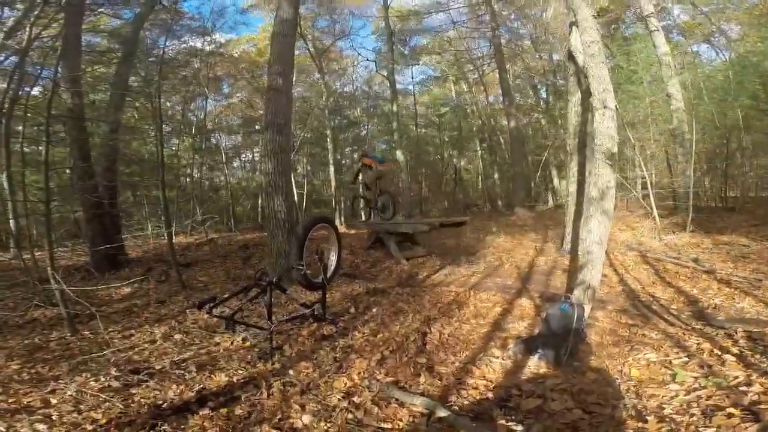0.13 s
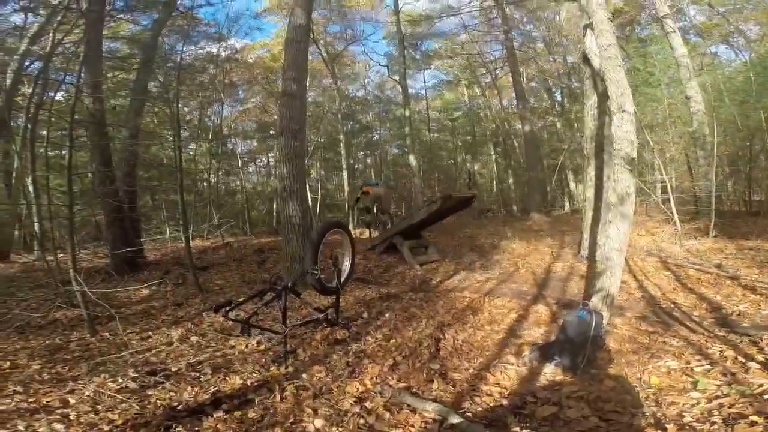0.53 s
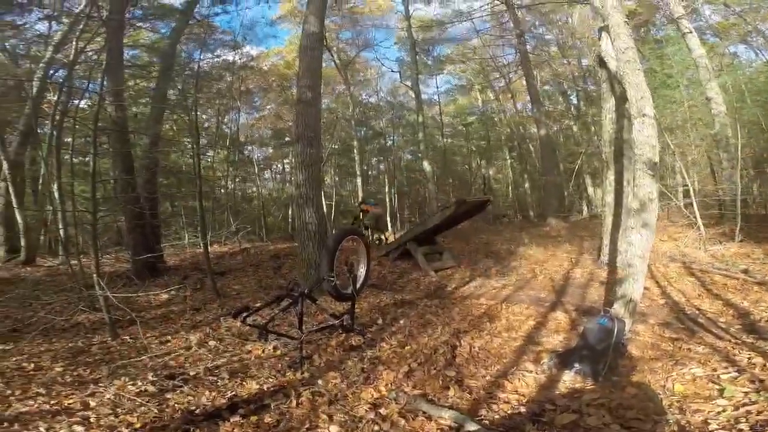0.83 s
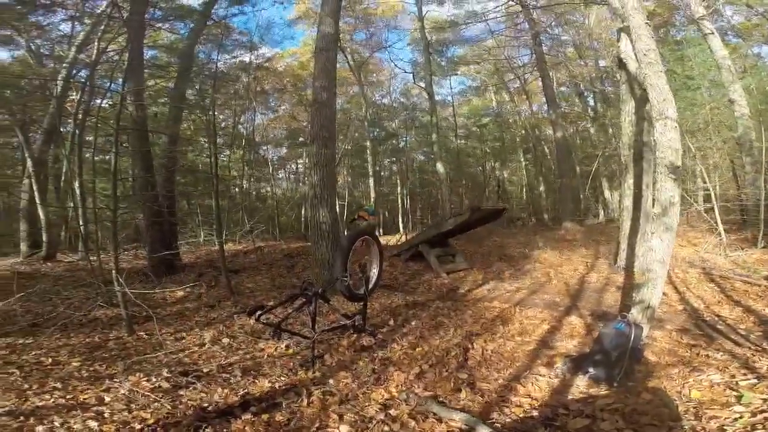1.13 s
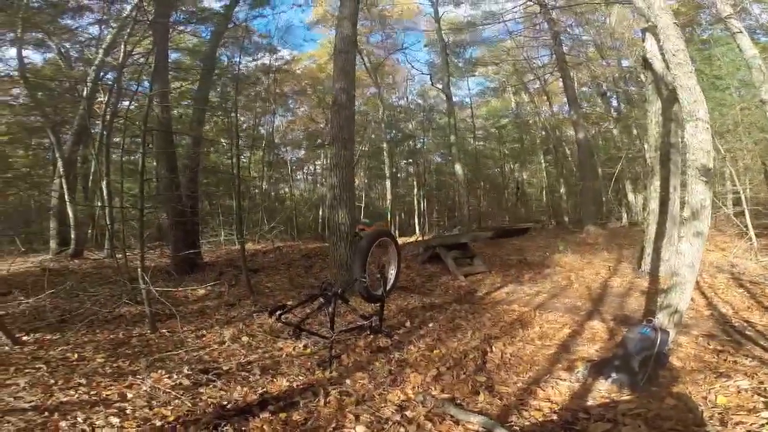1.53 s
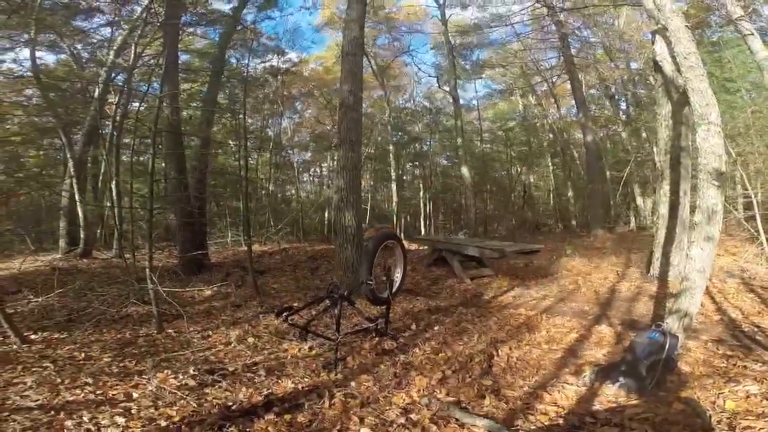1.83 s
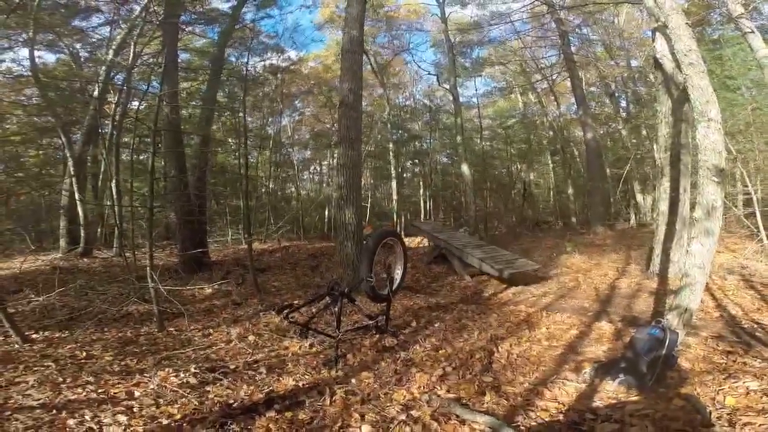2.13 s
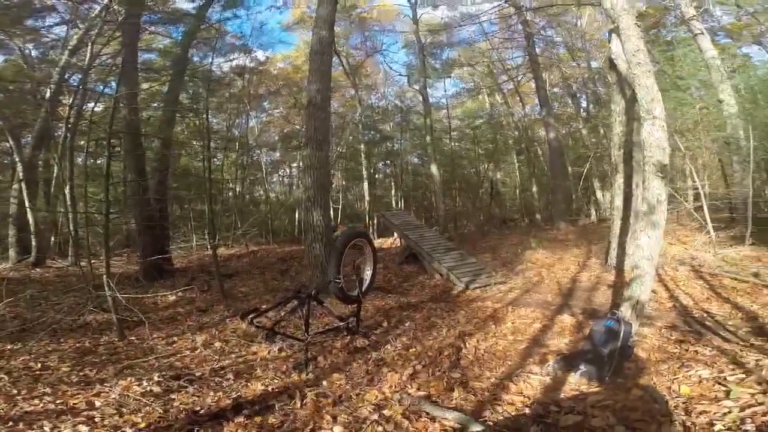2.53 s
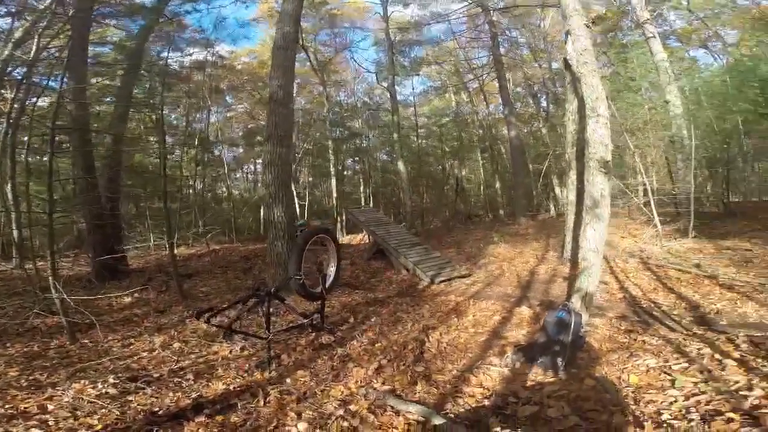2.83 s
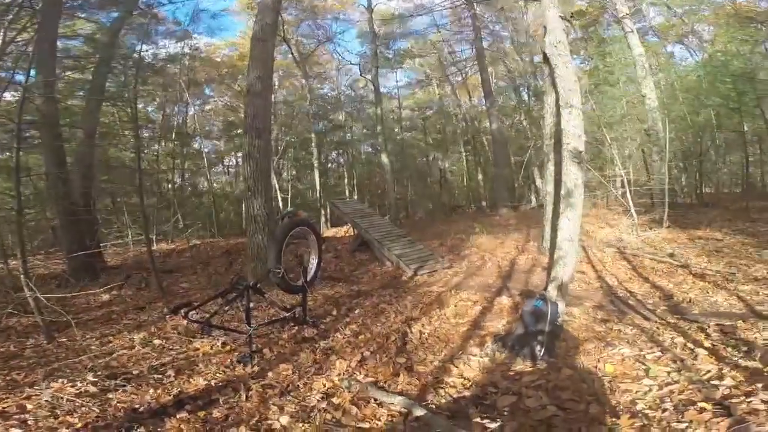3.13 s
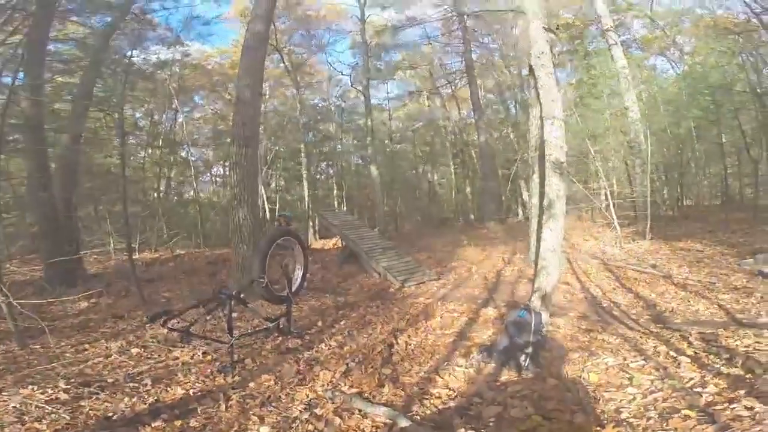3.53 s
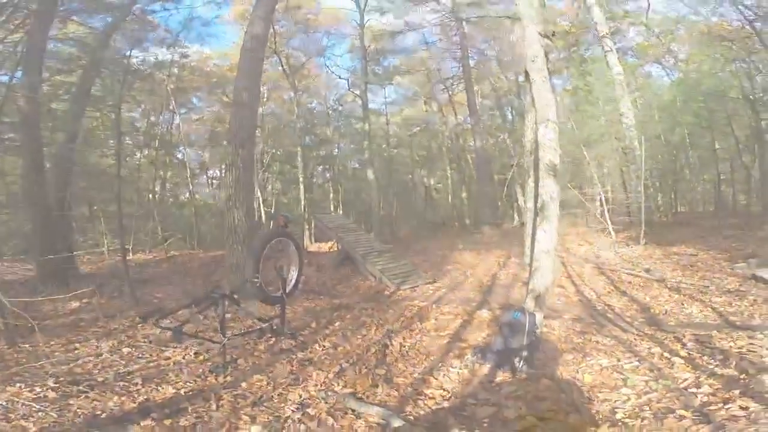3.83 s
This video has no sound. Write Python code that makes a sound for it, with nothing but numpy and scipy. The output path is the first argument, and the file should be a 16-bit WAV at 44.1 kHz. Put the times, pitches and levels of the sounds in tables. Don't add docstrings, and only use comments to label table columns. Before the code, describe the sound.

A wooden seesaw ramp clatters some metres away in a quiet, hissy forest: dry board knocks at 0.4-0.6, 0.9 and 1.2-1.3 seconds, with thin metal pings near 0.7 and 1.25 and light leaf rustle. A faint squeak at 2.2 precedes the ramp's sharp drop around 2.5, with small settling rattles. From 3 seconds, much louder close taps, scrapes and bumps hit the camera, over low wind.

```python
import sys
import numpy as np
from scipy import signal
from scipy.fft import rfft, irfft
from scipy.io import wavfile
from scipy.ndimage import uniform_filter1d

SR = 44100
rng = np.random.default_rng(int(sys.argv[2]) if len(sys.argv) > 2 else 0)


def unload_wav(signal):
    wavfile.write(
        sys.argv[1],
        SR,
        np.round(np.clip(np.atleast_2d(signal).T, -1, 1) * 32767).astype(np.int16),
    )


def volts_from_db(level):
    exponent = np.asarray(level, float) / 20
    return 10 ** exponent


N = 176400


def evened(x):
    return x / np.sqrt(np.mean(x ** 2) + 1e-20)


def add(mix, start_s, sound):
    part = mix[round(start_s * SR):][:len(sound)]
    part += sound[:len(part)]


def resonate(x, hz, width_hz):
    r = np.exp(-np.pi * width_hz / SR)
    return signal.lfilter([1 - r, 0, r - 1], [1, -2 * r * np.cos(2 * np.pi * hz / SR), r * r], x)


def resonate_twice(x, hz, width_hz):
    return resonate(resonate(x, hz, width_hz), hz, width_hz)


def body(x, peaks, tilt_db):
    total = 0
    for k, (hz, width_hz, db) in enumerate(peaks):
        gain = volts_from_db(db + tilt_db * np.log2(hz / 2500))
        total = total + (-1) ** k * gain * resonate(x, hz, width_hz)
    return total


def coloured(points):
    hz = np.fft.rfftfreq(N, 1 / SR)
    point_hz, point_db = np.transpose(points)
    shape_db = np.interp(np.log(hz + 1), np.log(point_hz + 1), point_db, left=-40, right=-90)
    return evened(irfft(rfft(rng.standard_normal(N)) * volts_from_db(shape_db), N))


def grains(count, per_s, spread_db):
    chance, side, size = rng.random((3, count))
    return evened((chance < per_s / SR) * np.sign(side - 0.5) * volts_from_db(-spread_db * np.log(size + 0.0018)))


def slow_noise(shape, size):
    noise = rng.standard_normal(shape)
    return evened(uniform_filter1d(uniform_filter1d(noise, size=size), size=size))


def rub(starts, strokes, peaks):
    out, t = np.zeros(N), np.arange(8000) / SR
    rise_s, fall_s, clump_db = 0.002, 0.005, 1.6
    for start_s, (length_s, db, fade_db, tilt_db) in zip(starts, strokes):
        attack = np.minimum(t / rise_s, 1)
        release = np.exp(np.minimum(length_s - t, 0) / fall_s)
        stroke = attack * release * volts_from_db(fade_db * np.minimum(t / length_s, 1))
        slips = grains(len(t), 9000, 1.5)
        clumps = uniform_filter1d(rng.standard_normal((len(peaks), len(t))), size=400, axis=1) * 20
        sound = np.zeros(len(t))
        for k, (hz, width_hz, peak_db) in enumerate(peaks):
            drive = resonate(slips * volts_from_db(clump_db * clumps[k]), hz, 2 * width_hz)
            sound += (-1) ** k * body(drive, [(hz, width_hz, peak_db)], tilt_db)
        add(out, start_s, volts_from_db(db) * stroke * sound / sound[:round(length_s * SR)].std())
    return out


# frequency in Hz, level in dB per Hz.
AIR_SPECTRUM = [(88,-20),(150,0.5),(300,-2.5),(1300,-7),(3500,-17),(6500,-22),(7600,-22),(11000,-25),(15100,-29.5)]
# frequency in Hz, level in dB per Hz.
RUMBLE_SPECTRUM = [(8.8, -43), (15, -4.5), (49, 1.5), (87, -5), (145, -11.5), (276, -19.5), (400, -25),
                   (520, -21.5), (880, -120)]
# time in seconds, rumble level in dB.
WIND_GUSTS = [(0, -57), (.5, -55), (1.5, -56), (2.16, -58), (2.6, -52), (3.1, -50), (3.45, -46), (3.7, -52),
              (3.8, -46.5), (4, -50)]
# frequency in Hz, level in dB per Hz.
LEAF_SPECTRUM = [(800,-15),(2000,-6),(3600,-2),(4800,-4.5),(6200,-3.5),(7200,-11.5),(10000,-45)]
# time in seconds, level in dB.
LEAF_LEVELS = [(0,-67),(.42,-64),(.65,-68),(.9,-64.5),(.92,-57),(1.0,-64),(1.3,-60.5),(1.45,-64.5),(1.9,-67.5),(4,-64)]
# frequency in Hz, level in dB.
WHINE_LINES = [(8781,-82),(11688,-89),(11719,-83),(14626,-84)]


def background():
    t = np.arange(N) / SR
    lumps = slow_noise((2, N), 1200)
    rumble = coloured(RUMBLE_SPECTRUM) * volts_from_db(np.interp(t, *np.transpose(WIND_GUSTS)) + 1.5 * lumps[0])
    leaves = coloured(LEAF_SPECTRUM) * volts_from_db(np.interp(t, *np.transpose(LEAF_LEVELS)) + 0.5 * lumps[1])
    wander = 1.2 * slow_noise(N, 6000)
    whine = sum(np.sqrt(2) * volts_from_db(db) * np.sin(2 * np.pi * hz * t + wander) for hz, db in WHINE_LINES)
    return volts_from_db(-61) * coloured(AIR_SPECTRUM) + rumble + leaves + whine


# start in seconds, size (full scale is 1), frequency in Hz, decay in seconds.
LOW_THUMPS = [(.434, -0.011, 126, 0.02), (1.3205, -0.016, 54, 0.03), (2.463, -0.006, 96, 0.024),
              (2.724, -0.01, 70, 0.024), (2.8, 0.017, 54, .01), (3.18, -0.024, 53, 0.033),
              (3.785, 0.064, 60, 0.0089), (3.801, -0.026, 67, 0.017), (3.3375, .03, 95, 0.0048),
              (3.192, -0.0031, 95, 0.016), (2.618, -0.0055, 110, 0.009), (1.317, .009, 135, .008)]


def thumps():
    out, t = np.zeros(N), np.arange(6000) / SR
    for start_s, size, hz, decay_s in LOW_THUMPS:
        add(out, start_s, size * np.sin(2 * np.pi * hz * t) * np.exp(-t / decay_s))
    return out


# start in seconds, peak level in dB, time to fall 60 dB in seconds,
# tilt in dB per octave, frequency of the struck board in Hz.
PLANK_CLATTERS = [(.436,-36,0.14,4,4430),(0.451,-34.5,0.054,1.5,3500),(.492,-33.5,0.06,3.5,2000),(0.51,-46,0.038,5,2700),(.553,-46.5,0.083,8.5,3800),(.579,-36.5,0.052,1.5,516),
                  (0.887,-38,0.081,3,2100),(.909,-51,0.054,2,5780),(1.156,-33,0.05,5,2120),(1.195,-45,0.045,4,1780),(1.263,-43,0.028,6.5,2800),(1.283,-43,0.03,5,6340),
                  (1.2905,-44,0.03,2,3750),(2.444,-49.5,0.067,-2,1900),(2.477,-33,0.054,2.5,3400),(2.479,-30.5,0.038,1,1090),(2.549,-42.5,0.19,0,1980),(2.597,-44,0.021,-2,3460),(2.663,-47,0.04,0.5,3800),(2.698,-46.5,0.06,1,2570)]
# frequency in Hz, width in Hz, level in dB.
PLANK_PEAKS = [(520,134,7.5),(1100,860,2),(1780,430,8),(2013,270,7),(2750,127,9.5),(3500,215,4.5),(3886,123,6),(4510,110,2.5),(4900,490,-2.5),(6220,480,-4.5),(8450,1070,-18)]


def plank():
    out, t = np.zeros(N), np.arange(6000) / SR
    rise_s, clicks_per_s = 0.0044, 5000
    for start_s, db, t60, tilt_db, hz in PLANK_CLATTERS:
        swell = np.minimum(t / rise_s, 1) ** 2 * volts_from_db(-60 * t / t60)
        impacts = grains(len(t), clicks_per_s, 2.1) * swell
        struck_board = resonate_twice(impacts, hz, 670)
        sound = body(impacts, PLANK_PEAKS, tilt_db) + volts_from_db(9) * struck_board
        add(out, start_s, volts_from_db(db - 8.5) * sound / sound[:600].std())
    echo_db, echo_t60 = -12, 0.8
    t = np.arange(SR // 2) / SR
    tail = rng.standard_normal(len(t)) * volts_from_db(-60 * t / echo_t60) * (t > 0.01)
    return out + volts_from_db(echo_db) * signal.fftconvolve(out, tail / np.linalg.norm(tail))[:N]


# start in seconds, peak level in dB, frequency in Hz, time to fall 60 dB in seconds.
SLAT_KNOCKS = [(.440, -40, 840, .03), (.449, -40, 2050, .04), (.452, -36, 3490, .03),
               (.4555, -34.5, 3550, .04), (.457, -40, 2500, .03), (.461, -40.5, 1230, 0.033),
               (.496, -35, 3890, 0.035), (.4975, -39, 2740, .04), (.500, -38, 990, 0.033),
               (.503, -42, 2000, .03), (.514, -47, 2650, .05), (.583, -47, 565, 0.037),
               (.584, -39, 3950, .03), (.587, -41, 1910, 0.046), (.889, -48, 3520, .03),
               (.892, -33, 1780, 0.03), (.8925, -37.5, 2160, 0.035), (.893, -39, 3530, .03),
               (.892, -45, 6470, 0.036), (.897, -40.5, 2000, 0.034), (2.448, -47.5, 1170, 0.017),
               (2.449, -53, 3600, .02), (2.482, -32.5, 1100, 0.026), (2.483, -34, 3850, .05),
               (2.484, -37, 3270, .05), (2.486, -47, 8500, .05), (2.494, -46, 646, 0.052),
               (2.497, -41, 1290, 0.034), (2.59, -47, 3480, 0.036)]


def knocks():
    out, t = np.zeros(N), np.arange(4000) / SR
    rise_s = 0.0011
    for start_s, db, hz, t60 in SLAT_KNOCKS:
        envelope = volts_from_db(db - 60 * t / t60) * np.minimum(t / rise_s, 1)
        add(out, start_s, envelope * np.sin(2 * np.pi * hz * t))
    return out


# start in seconds, frequency in Hz, level in dB, width in Hz,
# time to fall 60 dB in seconds.
TAG_PINGS = [
    (.706, 10890, -46.5, 39.7, 0.1),
    (.735, 10980, -61, 150, 0.33),
    (1.228, 12500, -62, 150, .06),
    (1.24, 13100, -69, 300, .4),
    (1.269, 13200, -47.5, 300, 0.13),
    (1.284, 13400, -62, 250, 0.12),
]


def tags():
    out, t = np.zeros(N), np.arange(12000) / SR
    rise_s = 0.0054
    for start_s, hz, db, width_hz, t60 in TAG_PINGS:
        noise = rng.standard_normal(2 * len(t))
        ring = resonate_twice(noise, hz, width_hz)[len(t):]
        envelope = volts_from_db(db - 60 * t / t60) * np.minimum(t / rise_s, 1)
        add(out, start_s, envelope * ring / ring[:800].std())
    return out


def pivot():
    out = np.zeros(N)
    start_s, length_s, hz, width_hz, db = 2.2, 0.24, 1700, 160, -65.5
    count = round(length_s * SR)
    squeak = evened(resonate_twice(rng.standard_normal(20000), hz, width_hz))
    add(out, start_s, volts_from_db(db) * np.sqrt(np.hanning(count)) * squeak[:count])
    return out


# start in seconds, length in seconds, frequency in Hz, width in Hz, level in dB.
RUB_SWELLS = [(3.275, 0.052, 1470, 530, -43.5), (3.27, 0.043, 2650, 720, -46.5),
              (3.36, 0.041, 2800, 790, -51.5), (3.355, .06, 580, 560, -48), (3.435, .045, 2950, 470, -48),
              (3.215, 0.042, 12600, 3000, -63), (3.428, 0.043, 11000, 4300, -62),
              (3.795, .045, 6500, 1200, -53), (3.80, 0.17, 2900, 420, -50.5), (3.908, .024, 1000, 220, -43),
              (3.88, 0.07, 9500, 1500, -60), (4.1, 0.17, 11700, 3000, -67), (2.48, 0.023, 10000, 3000, -59),
              (2.53, 0.085, 9000, 4000, -67.5), (2.5, 0.13, 620, 150, -60.5), (3.64, 0.035, 5770, 630, -62)]


def swells():
    out = np.zeros(N)
    for start_s, length_s, hz, width_hz, db in RUB_SWELLS:
        band = evened(resonate_twice(grains(8000, 1500, 2.6), hz, width_hz))
        arch = np.sqrt(np.hanning(round(length_s * SR)))
        add(out, start_s, volts_from_db(db) * arch * band[:len(arch)])
    return out


def settling_slats():
    damped = [(hz, width_hz * 1.9, db) for hz, width_hz, db in PLANK_PEAKS]
    return rub([2.497], [(0.118, -52, -2, 1.5)], damped)


# start in seconds, peak level in dB, main ring in Hz,
# tilt in dB per octave, low push size (full scale is 1).
HOUSING_TAPS = [(2.983, -36, 600, -12, 0.017), (3.1248, -36, 6500, 9, 0.002), (3.638, -46, 3500, 0, 0.002),
                (3.177, -34, 2500, -6.5, -0.012), (3.2176, -12.5, 2500, -0.5, 0.021),
                (3.4281, -18.5, 1670, 12.5, -0.084), (3.4296, -18.5, 2500, 7.5, -0.02),
                (3.431, -24.5, 1670, -2.5, 0.02), (3.563, -35, 2500, 5.5, -0.033),
                (3.7813, -22, 1530, 7, -0.044), (3.7913, -14, 2960, 1.5, -0.027),
                (2.6898, -43, 600, -3, 0.01), (2.7212, -51, 504, 7, 0.011)]
# frequency in Hz, width in Hz, level in dB.
HOUSING_PEAKS = [(600, 124, 2), (1646, 108, 3), (2660, 97, -2), (2730, 350, 3), (3750, 330, -1.5),
                 (4640, 300, -11.5), (5680, 260, -7), (7200, 1600, -21), (9200, 1000, -15),
                 (11700, 9700, -33)]


def taps():
    out, t = np.zeros(N), np.arange(3000) / SR
    tick_s, push_s = 0.00004, 0.00069
    tick = np.exp(-((t - 3 * tick_s) / tick_s) ** 2)
    shove = t / push_s * np.exp(1 - t / push_s)
    for start_s, db, hz, tilt_db, push in HOUSING_TAPS:
        main_ring = resonate_twice(tick, hz, 610)
        ring = body(tick, HOUSING_PEAKS, tilt_db) + volts_from_db(9.5) * main_ring
        add(out, start_s, -volts_from_db(db) * ring / abs(ring).max() + push * shove)
    return out


FINGER_STARTS = [2.983, 3.09, 3.4295, 3.638, 3.793, 3.85, 3.93]
# length in seconds, level in dB, fade in dB, tilt in dB per octave.
FINGER_STROKES = [
    (0.018, -46, -14, 3),
    (0.039, -58, 0.5, 5),
    (0.022, -37.5, -18, 3.5),
    (0.033, -55.5, -3, 5),
    (0.059, -38, -11, 2.5),
    (0.082, -46.5, 0.5, 3),
    (0.05, -56, -5.5, 2),
]
# frequency in Hz, width in Hz, level in dB.
FINGER_PEAKS = [(607, 116, 5.5), (1010, 400, 0.5), (1650, 490, 1.5), (2420, 230, 2), (2930, 380, 0),
                (3930, 940, -8), (5000, 700, -15.5), (6090, 1470, -14), (9260, 1500, -24),
                (12500, 3100, -33)]


def finger_scrapes():
    return rub(FINGER_STARTS, FINGER_STROKES, FINGER_PEAKS)


LATCH_STARTS = [3.192, 3.219]
# length in seconds, level in dB, fade in dB, tilt in dB per octave.
LATCH_BUZZES = [
    (0.026, -47, -7, 0),
    (0.032, -27.5, -15.5, -0.4),
]
# frequency in Hz, width in Hz, level in dB.
LATCH_PEAKS = [(600, 370, -6), (1580, 350, -4.5), (2500, 550, 2.5), (3900, 520, 2.5), (5000, 1200, -12),
               (6700, 1200, -15.5), (10000, 3600, -28)]


def latch_buzzes():
    return rub(LATCH_STARTS, LATCH_BUZZES, LATCH_PEAKS)


PALM_STARTS = [3.258, 3.283, 3.33, 3.36, 3.431, 3.478]
# length in seconds, level in dB, fade in dB, tilt in dB per octave.
PALM_DRAGS = [
    (0.034, -45.5, 1, 0),
    (0.048, -42, -5.5, -1.5),
    (0.028, -50, 2, -2.5),
    (0.076, -43, -5.5, -2.5),
    (0.036, -34.5, -20, -1.5),
    (0.056, -59, -7, 6),
]
# frequency in Hz, width in Hz, level in dB.
PALM_PEAKS = [(600, 340, -3), (1100, 370, -5), (1560, 460, -1), (2830, 430, -5), (3800, 390, -14.5)]


def palm_drags():
    return rub(PALM_STARTS, PALM_DRAGS, PALM_PEAKS)


def scene():
    forest = background() + thumps()
    ramp = plank() + knocks() + tags() + pivot() + swells() + settling_slats()
    hand = taps() + finger_scrapes() + latch_buzzes() + palm_drags()
    return (forest + ramp + hand)[None]


def top_cut(x):
    return signal.sosfilt(signal.butter(12, 15270, fs=SR, output="sos"), x)


def record(dry):
    low_pass = signal.firwin(255, 15300, fs=SR)[None]
    limited = signal.oaconvolve(dry, low_pass, "same")
    return top_cut(limited)


dry = scene()
out = record(dry)
unload_wav(out)
```